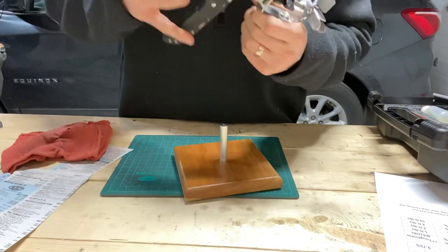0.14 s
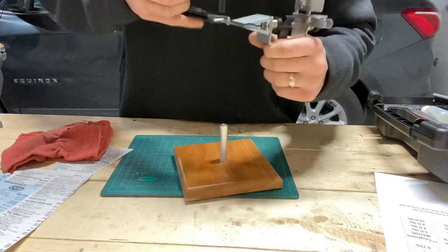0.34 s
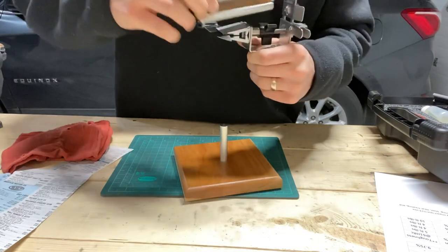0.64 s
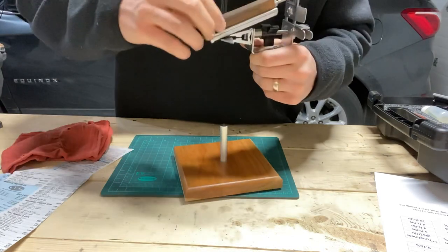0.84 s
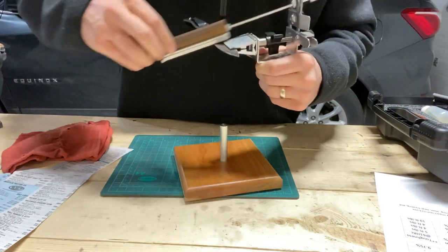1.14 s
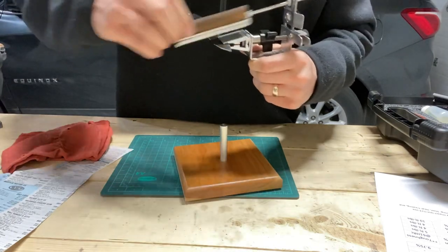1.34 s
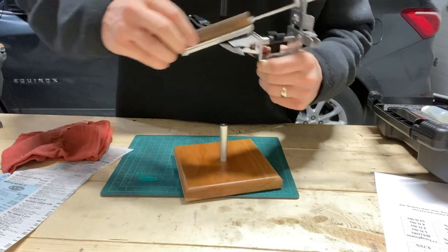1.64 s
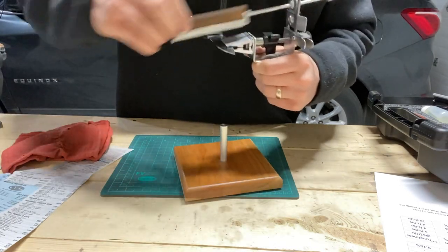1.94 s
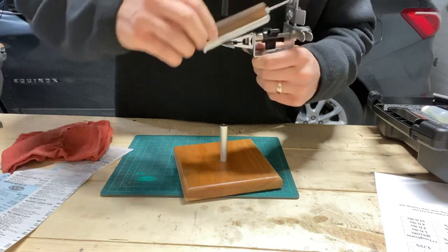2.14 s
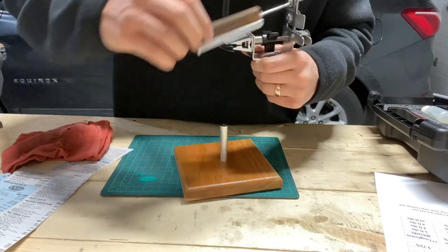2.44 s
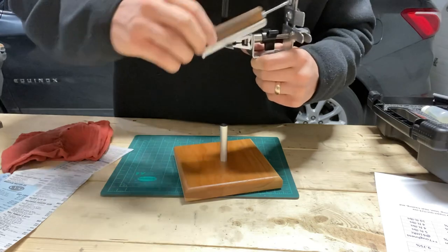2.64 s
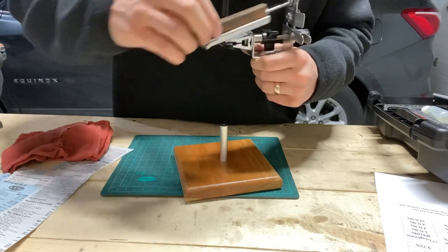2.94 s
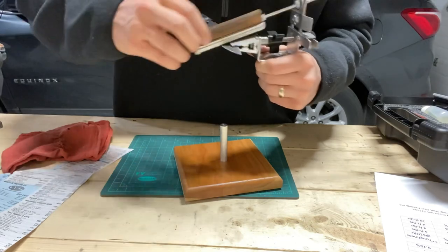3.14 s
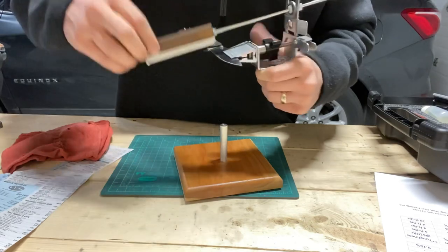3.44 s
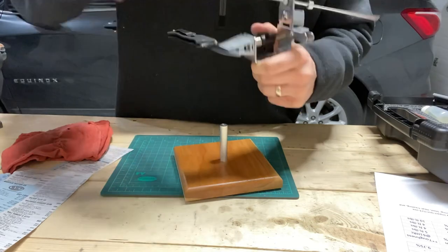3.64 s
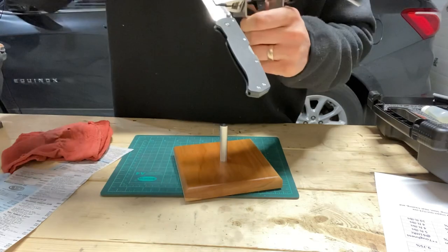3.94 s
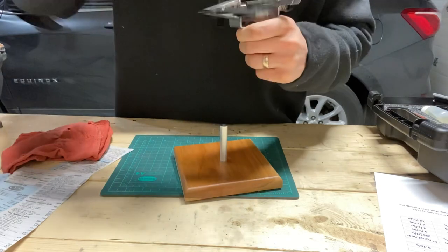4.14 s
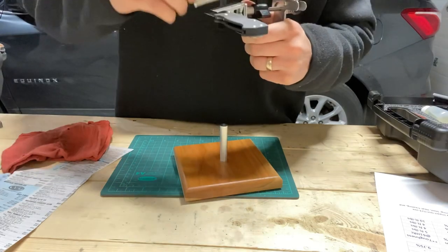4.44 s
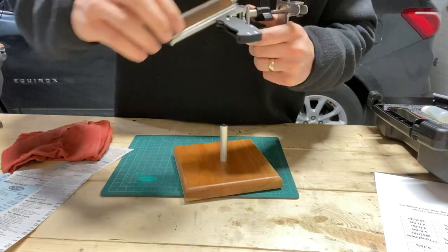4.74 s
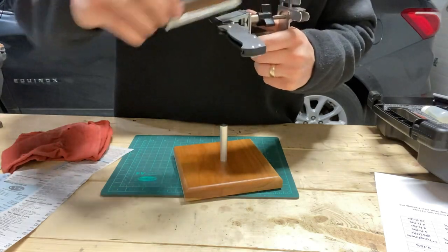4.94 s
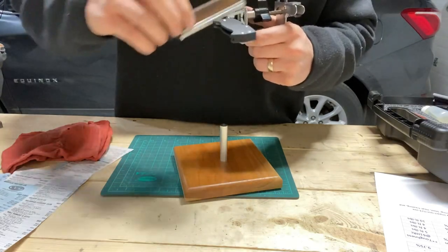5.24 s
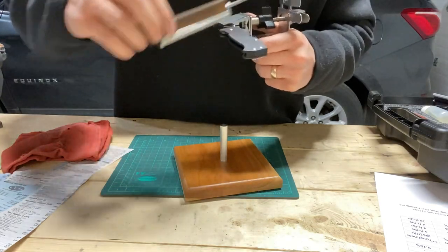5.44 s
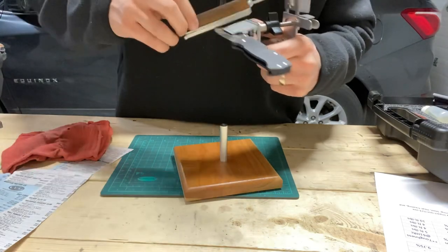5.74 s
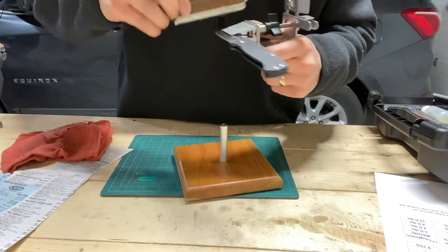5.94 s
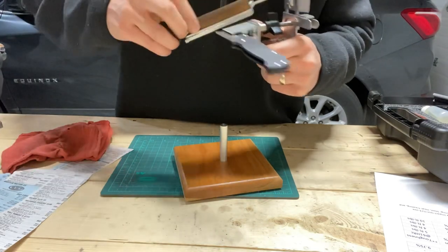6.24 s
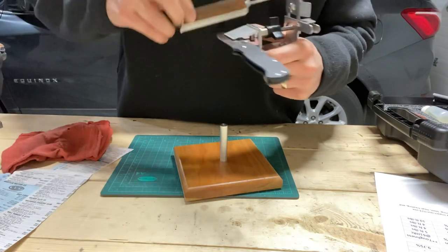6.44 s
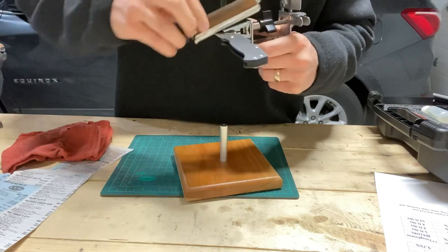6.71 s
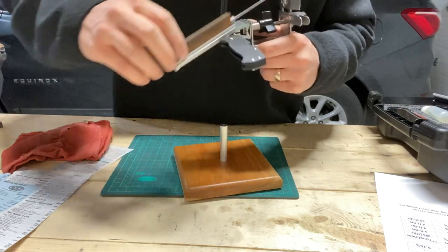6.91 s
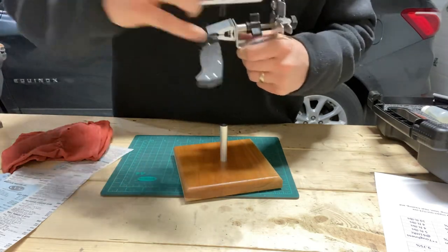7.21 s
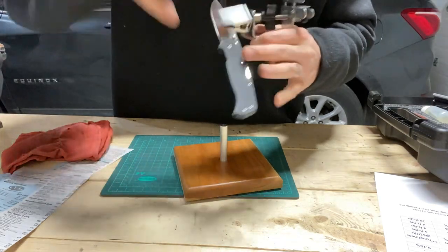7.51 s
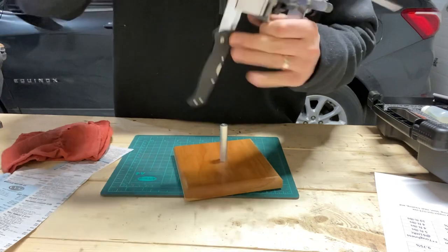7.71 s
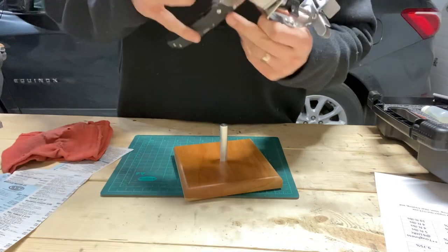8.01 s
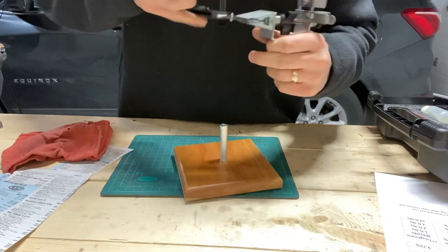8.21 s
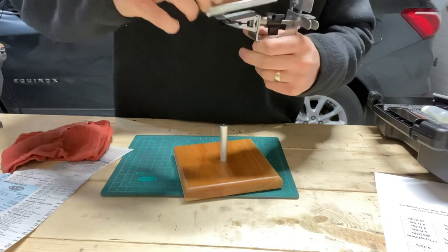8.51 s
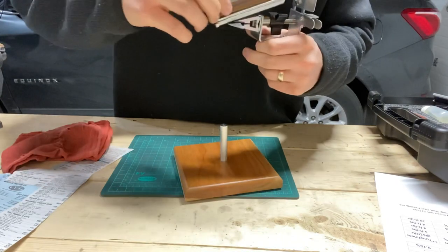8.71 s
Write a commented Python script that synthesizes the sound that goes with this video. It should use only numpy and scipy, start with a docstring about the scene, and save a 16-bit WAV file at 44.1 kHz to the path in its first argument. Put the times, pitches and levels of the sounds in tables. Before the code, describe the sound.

In a garage with a steady low hum, a steel knife clamp rubs, squeaks and snaps over. A leather strop then makes five passes along the blade, with light taps, a faint sliding rod hiss and short rasps. The rod clacks, the clamp turns, and five more passes follow. Near the end the clamp rubs and snaps again, and the strop lands softly. The tool sounds close, with a short room echo.

```python
"""A low hum fills a garage, where a knife in a guided sharpener is stropped at the workbench.
First the steel clamp rubs, squeaks and snaps over. Then five passes: the leather lands on the blade
and the guide rod hisses through its pivot; on three of them the edge bites and rasps. Near 3.5 s the
rod clacks at its stop and the clamp is turned, and the other side gets five passes, three rasping.
From 7.2 s the clamp rubs and snaps over again, and the strop touches down softly one last time."""
import sys
import numpy as np
from scipy import signal
from scipy.fft import rfft, irfft
from scipy.io import wavfile

SR = 44100
rng = np.random.default_rng(int(sys.argv[2]) if len(sys.argv) > 2 else 0)


def dump_mix(stems):
    """Bounce the given channels to the path in sys.argv[1] as a 16-bit WAV at rate SR."""
    frames = np.atleast_2d(stems).T  # one column per channel
    limited = np.clip(frames, -1, 1)  # hard clip at full scale
    pcm = np.round(limited * 32767).astype(np.int16)
    wavfile.write(sys.argv[1], SR, pcm)


N = 391166
TIME = np.arange(N) / SR

# rumble of moving air: freq_hz, gain_db
AIR_EQ = [(15, 0.5), (35, -14), (48, -2), (62, 10), (85, 1.5), (145, 3.5), (175, -7.5), (260, -19.5),
          (400, -31.5), (700, -38), (1750, -40), (2050, -38), (2400, -41), (6000, -45)]
# machine tones in the room: pitch_hz, level_db
HUM_TONES = [(59.6, -60.5), (120, -71), (144, -68.5), (199, -73)]
# rod and clamp hit their stops: time_s, level_db, bright_db, decay_ms
CLACKS = [(0.024, -48.5, 0, 4.2), (0.1692, -49.5, -2, 4.2), (0.2691, -25.5, 4, 2.2), (0.3506, -19, 5, 1.7),
          (2.4946, -45, 5, 2), (3.3475, -22.5, 1, 2.5), (3.3511, -24.5, 8, 4), (3.678, -30.5, -3, 3.9),
          (3.7122, -33, -6, 3.3), (3.7704, -31, 2, 3.3), (4.013, -42.5, -6.5, 1.8), (4.0334, -34, 8.5, 1),
          (4.1525, -29, 8, 3.5), (4.8043, -33, 12.5, 2.4), (4.8198, -37.5, 14.5, 3.8),
          (5.366, -23.5, 9, 4.4), (6.0144, -52, 8, 5.4), (6.186, -41.5, 13.5, 1.4),
          (6.9656, -27.5, 10.5, 2.7), (7.26, -32, 6.5, 1.8), (7.3106, -32, -0.5, 0.62),
          (7.569, -30, 2.5, 1.3), (7.6057, -38, 7, 5.7), (7.7617, -47, -26, 2.5), (8.109, -33, 13.5, 2.3),
          (8.2023, -19, 3, 3.5)]
# crack of steel parts meeting: freq_hz, gain_db
STEEL_EQ = [(200, -3.5), (450, 3.5), (620, 3.5), (1100, 10), (1600, 1.5), (2300, 11.5), (3100, 11),
            (4200, 1), (5500, -3.5), (7000, -7), (8800, -5), (12000, -7), (16000, 3)]
# the clamp rubs in its socket: start_s, end_s, first_db, last_db
CLAMP_RUBS = [(0.208, 0.262, -60.5, -46.5), (0.258, 0.378, -78, -39), (2.473, 2.653, -60.5, -76),
              (3.502, 3.832, -62.5, -51), (4.159, 4.204, -42, -48.5), (4.956, 5.074, -58, -70),
              (5.993, 6.032, -72, -55.5), (7.25, 7.397, -57.5, -61), (7.556, 7.713, -50, -66),
              (8.034, 8.103, -64.5, -49), (8.093, 8.24, -47, -58)]
# tone of that rub: freq_hz, gain_db
SOCKET_EQ = [(200, -17.5), (450, -8.5), (650, -13.5), (1000, -7.5), (2500, 2), (3800, 1.5), (6000, -5),
             (9000, -10.5), (16000, -19)]
# dry joints sing: start_s, end_s, first_db, last_db, pitch_hz
SQUEAKS = [(0.214, 0.267, -63.5, -61, 2770), (0.262, 0.36, -47, -59, 3500), (2.487, 2.54, -65, -71, 2640),
           (3.579, 3.644, -69, -61, 2730), (3.614, 3.654, -61.5, -57, 3800), (4.986, 5.03, -67, -59, 2650),
           (5.994, 6.03, -62.5, -63, 2710), (8.108, 8.207, -47, -62.5, 3460)]
# partials of a squeak: pitch_ratio, gain_db
SQUEAK_PARTIALS = [(1, 3), (.74, -9.5), (1.33, -4)]
# hard hits ring one steel part: time_s, pitch_hz, level_db
PINGS = [(.270, 3430, -28), (0.352, 1040, -46.5), (0.352, 2380, -29), (1.081, 9300, -25),
         (3.352, 8600, -32), (4.155, 12650, -42), (5.365, 11940, -26.5), (6.845, 7640, -29.5),
         (6.964, 11800, -26.5), (7.259, 11640, -33), (7.762, 1630, -48), (8.201, 1016, -37.5)]
# the rod slides on its own as the clamp turns over: start_s, end_s, peak_db
ROD_SWINGS = [(0.398, 0.66, -63), (7.34, 7.58, -65.5)]
# hiss of the sliding rod: freq_hz, gain_db
ROD_EQ = [(300, -16.5), (4000, -15.5), (6300, -15), (7400, -26.5), (8500, -2), (10000, 3), (13000, -0.5),
          (16000, -4)]
# the strop lands, is pushed and drawn back: time_s, landing_db, thud_db, push_db, return_db
PASSES = [(0.842, -42.5, -45, -66.5, -58.5), (1.5212, -43, -47, -60, -61.5),
          (2.1017, -30.5, -35.5, -65, -63), (2.5828, -48, -38.5, -64, -62), (3.057, -41, -40, -61.5, -76),
          (4.5304, -39.5, -39, -63.5, -57.5), (5.1108, -37.5, -39, -65.5, -62),
          (5.6111, -41.5, -39.5, -65.5, -67.5), (6.1712, -29.5, -36.5, -64.5, -67),
          (6.631, -27.5, -42.5, -63.5, -60.5), (8.6838, -62, -58.5, -71.5, -62.5)]
# firm landings are brighter than soft ones: landing_db, bright_db, decay_ms
LANDING_TOUCH = [(-39.5, -3.5, 4), (-26.5, 4, 4.5)]
# tone of leather on steel: freq_hz, gain_db
LEATHER_EQ = [(100, -9.5), (220, -4.5), (430, 0), (620, -8.5), (950, 4.5), (1280, -3.5), (1600, 7),
              (2000, -3), (2900, 3.5), (4200, -5), (6000, -6), (9000, -13.5), (16000, -18.5)]
# the rod shifts in its pivot: time_s, level_db
PIVOT_TICKS = [(1.035, -49), (1.211, -44.5), (1.833, -41), (2.291, -50.5), (2.7581, -51.5), (3.5414, -46.5),
               (5.232, -45), (5.7561, -51), (6.774, -50.5), (7.5538, -49)]
# leather on the edge: start_s, end_s, first_db, last_db, fizz_db, ring_hz, ring_db, body_db, bite_db
RASPS = [(1.0705, 1.164, -37.5, -41.5, -6, 1600, -11, -25, -23.5),
         (1.6824, 1.763, -34, -44.5, -9.5, 1550, -10.5, -15, -25),
         (3.2435, 3.34, -38.5, -43.5, -8.5, 1640, -15, -29.5, -36.5),
         (4.754, 4.829, -40, -35, -10.5, 2070, -8.5, -23, -33),
         (5.275, 5.361, -38, -37, -14, 2110, -7, -21.5, -28),
         (6.842, 6.982, -41, -40.5, -13, 2230, -11, -29, -25)]
# modes of the blade and its clamp: pitch_hz, gain_db, t60_s
BLADE_MODES = [(447, 3, .08), (1329, -10, .5), (1571, -5, .07), (1657, -5, .07), (2103, -1, .07),
               (2326, 2, .06), (2720, 7, .045), (3515, 3, .06), (7300, 12, .035), (8600, 14, .035),
               (12300, 17, .025)]
# reverb time of the garage: freq_hz, t60_s
GARAGE_DECAY = [(200, 0.13), (600, 0.45), (1500, 0.4), (4000, 0.48), (8000, 0.44), (14000, 0.37)]
# overall tone, with bright peaks at 7-9 kHz and the highest treble cut away: freq_hz, gain_db
OVERALL_EQ = [(100, 1), (6000, -1.5), (7200, 6), (8300, 1), (9400, 4.5), (10200, -10.5), (11500, 1.5),
              (12800, -4.5), (14000, -15.5), (14900, -25), (16200, -37.5)]
# phase between the sides: freq_hz, left_lead_rad
STEREO_PHASE = [(50, 0), (500, -.25), (1100, -.7), (1600, -.3), (2900, -1.8), (4400, -2.2), (5500, -2.1),
                (6500, -1), (8000, 0), (9200, 1.3), (10400, 3.14), (11500, 4.5), (12700, 6.1), (13700, 6.6),
                (14800, 8.8)]
# likeness of the sides: freq_hz, correlation
STEREO_LIKENESS = [(60, .96), (150, .85), (400, .88), (1200, .72), (2500, .75), (4300, .35), (6000, .5),
                   (7500, .96), (16000, .97)]
# lean of the image: freq_hz, left_minus_right_db
STEREO_BALANCE = [(30, 1), (300, 1.5), (700, -3), (1400, -3.5), (2500, -1.5), (8000, -0.5)]


def amp(db):
    """Decibels to gain."""
    return 10 ** (np.asarray(db) / 20)


def unit(x):
    """Scales to rms 1."""
    return x / np.sqrt(np.mean(x ** 2) + 1e-20)


def curve_at(points, hz):
    """Reads a curve on a log frequency axis."""
    freqs, values = np.transpose(points)
    return np.interp(np.log(hz + 1), np.log(freqs + 1), values)


def bins(x):
    """Frequencies of the spectrum of x."""
    return np.fft.rfftfreq(x.shape[-1], 1 / SR)


def add(mix, time_s, sound):
    """Drops a stereo sound into the mix."""
    part = mix[:, max(round(time_s * SR), 0):][:, :sound.shape[1]]
    part += sound[:, :part.shape[1]]


def eq(x, points, size=2048):
    """Minimum-phase EQ, so attacks stay sharp."""
    log_gain = np.log(amp(curve_at(points, abs(np.fft.fftfreq(size, 1 / SR)))))
    taps = np.fft.ifft(np.exp(np.conj(signal.hilbert(log_gain)))).real[:size // 2]
    return signal.oaconvolve(x, taps[None], axes=1)[:, :x.shape[1]]


def band(x, lo_hz, hi_hz):
    """Band-pass, at rms 1."""
    return unit(signal.sosfilt(signal.butter(2, [lo_hz, hi_hz], "band", fs=SR, output="sos"), x))


def resonate(x, hz, width_hz):
    """One resonance driven by x, at rms 1."""
    return band(x, hz - width_hz / 2, hz + width_hz / 2)


def stereo(x):
    """Blends two unrelated channels to the scene's stereo width."""
    spectrum = rfft(x)
    angle = np.arcsin(np.clip(curve_at(STEREO_LIKENESS, bins(x)), 0, 1)) / 2
    return irfft(np.cos(angle) * spectrum + np.sin(angle) * spectrum[::-1], x.shape[1])


def noise(size=N):
    """Stereo white noise."""
    return stereo(rng.standard_normal((2, size)))


def drift(points):
    """Random modulation through points spread over the scene."""
    return np.interp(TIME, np.linspace(0, TIME[-1], points), np.clip(rng.standard_normal(points), -2, 2))


def friction(slips_per_s, spread_db, smooth=.6):
    """Tiny slips of uneven size over a smooth hiss."""
    slips = amp(spread_db * np.minimum(rng.exponential(1, N), 4)) * (rng.random(N) < slips_per_s / SR)
    power = signal.lfilter([1], [1, -np.exp(-1 / (.0004 * SR))], slips ** 2)
    return unit(noise() * np.sqrt(power / power.mean() + smooth ** 2))


def contact(start, end, first_db, last_db, attack_s=.0011, release_s=.011):
    """Envelope of a rub: it grips at once, ramps its pressure and lets go."""
    grip = np.clip(np.minimum((TIME - start) / attack_s, (end - TIME) / release_s + .5), 0, 1)
    return grip * amp(np.interp(TIME, [start, end], [first_db, last_db]))


def hit(time_s, db, bright_db, decay_ms, body_db=-13.5):
    """Cue for a knock: time_s, tick_db (tip), clack_db (frame), thud_db (hand-held body), decay_ms."""
    return time_s, db + bright_db, db, db + body_db, decay_ms


def room_hum(air_db=-53, waver_rad=.52):
    """The bed: a rumble of moving air with wavering machine tones in it."""
    white = noise()
    air = unit(irfft(rfft(white) * amp(curve_at(AIR_EQ, bins(white))), N))
    tones = sum(amp(db) * unit(np.sin(2 * np.pi * hz * TIME + waver_rad * drift(60)))
                for hz, db in HUM_TONES)
    return amp(air_db) * air + tones


def stop_clacks(rebound_s=.022, rebound_db=-20):
    """Cues: steel meets its stop and rebounds once."""
    delays = rebound_s * rng.uniform(.5, 1.5, len(CLACKS))
    rebounds = [hit(s + delay, db + rebound_db, bright, decay)
                for (s, db, bright, decay), delay in zip(CLACKS, delays)]
    return [hit(*row) for row in CLACKS] + rebounds


def knocks(cues, lead_s=.005, attack_s=.0007, lead_in_db=-25, rattle_db=-20, rattle_s=.0046, size=4096):
    """Plays each cue: a faint swell of noise, a crack of dense steel modes, a rattle of loose joints."""
    out, t = np.zeros((2, N)), np.arange(size) / SR - lead_s
    after = np.maximum(t, 0)
    lead_in = amp(lead_in_db) * np.exp(-2 * abs(t) / lead_s)
    attack = 1 - np.exp(-after / attack_s)
    rattle = amp(rattle_db) * np.exp(-after / rattle_s)
    for s, tick_db, clack_db, thud_db, decay_ms in cues:
        envelope = lead_in + attack * (np.exp(-1000 * after / decay_ms) + rattle)
        crack = eq(noise(size) * envelope, STEEL_EQ)
        top_hz = np.interp(tick_db, [-42, -22], [12500, 17000])  # harder hits are brighter
        tick = amp(tick_db - 18.5) * band(crack, 5200, top_hz)
        clack = amp(clack_db - 20.5) * band(crack, 850, 4000)
        thud = amp(thud_db - 22.5) * band(crack, 260, 650)
        add(out, s - lead_s, tick + clack + thud)
    return out


def blade_ring(tool, ring_db=-56):
    """Every hit and rub sets the blade ringing."""
    t = np.arange(SR // 2) / SR
    ring = sum(amp(db + ring_db - 60 * t / t60) * np.sin(2 * np.pi * hz * t)
               for hz, db, t60 in BLADE_MODES)
    return signal.oaconvolve(tool, ring[None], axes=1)[:, :N]


def garage_reverb(tool, early_db=-9, early_decay_s=.011, echoes_per_s=1500, tail_db=-12):
    """Quick echoes off the bench and the parked car, then the tail of the room."""
    t = np.arange(SR) / SR
    wash = noise(SR) * np.clip((t - .003) / .002, 0, 1)
    hz, frame_s, spectrum = signal.stft(wash, SR, nperseg=256)
    decay = amp(-60 * frame_s / curve_at(GARAGE_DECAY, hz)[:, None])
    tail = signal.istft(spectrum * decay, SR, nperseg=256)[1][:, :SR]
    echoes = stereo(rng.standard_normal((2, SR)) * (rng.random(SR) < echoes_per_s / SR))
    early = echoes * np.exp(-t / early_decay_s) * (t > .002)
    room = (amp(early_db) * unit(early) + amp(tail_db) * unit(tail)) / np.sqrt(SR)
    room = eq(room, [(4500, 1), (8000, -4)])  # soften the top
    return signal.oaconvolve(tool, room, axes=1)[:, :N]


def clamp_rub(level_db=-1, squeak_db=-4):
    """Dry, gritty rubbing as the clamp turns; now and then a joint sings."""
    grit = friction(slips_per_s=220, spread_db=4)
    rubs = sum(contact(*rub) for rub in CLAMP_RUBS) * unit(eq(grit, SOCKET_EQ))
    squeaks = sum(contact(*rub) * amp(db) * resonate(grit, ratio * hz, width_hz=330)
                  for *rub, hz in SQUEAKS for ratio, db in SQUEAK_PARTIALS)
    return amp(level_db) * rubs + amp(squeak_db) * squeaks


def loose_joints(ticks_per_s=14, lift_db=14, spread_db=3.5, count=400):
    """Cues: the joints tick at random while the clamp rubs, riding its level."""
    times = np.cumsum(rng.exponential(1 / ticks_per_s, count))
    lifts = lift_db + spread_db * rng.standard_normal(count)
    return [hit(s, lift + np.interp(s, [start, end], ramp_db), bright_db=1.5, decay_ms=2.5)
            for start, end, *ramp_db in CLAMP_RUBS for s, lift in zip(times, lifts) if start < s < end]


def steel_pings(attack_s=.00013, decay_s=.0051, size=4096):
    """Rod, stop or clamp jaw rings for an instant before the hand damps it."""
    out, t = np.zeros((2, N)), np.arange(size) / SR
    envelope = np.exp(-t / decay_s) * (1 - np.exp(-t / attack_s))
    for s, hz, db in PINGS:
        add(out, s, amp(db) * np.tile(envelope * np.sin(2 * np.pi * hz * t), (2, 1)))
    return out


def rod_speed(longest_s=.74, arch=.8):
    """Speed envelope of the rod: one swell for each swing, push and return."""
    travels = list(ROD_SWINGS)
    gaps = np.diff([row[0] for row in PASSES] + [np.inf])
    for (s, _, _, push_db, return_db), length in zip(PASSES, np.minimum(gaps, longest_s)):
        travels.append((s, s + .49 * length, push_db))
        travels.append((s + .51 * length, s + .95 * length, return_db))
    speed = np.zeros(N)
    for start, end, db in travels:
        progress = np.clip((TIME - start) / (end - start), 0, 1)
        speed += amp(db) * (np.sin(np.pi * progress) + 1e-9) ** arch
    return speed


def rod_slide(level_db=-5, flutter_db=5, whistle_db=-9, wander_hz=170, dry_db=-22, catch_db=8):
    """The polished rod hisses with its speed, under a thin wandering whistle; dry spots catch."""
    white = noise()
    hiss = unit(eq(white, ROD_EQ)) * amp(flutter_db * drift(420))
    wander = np.exp(2j * np.pi * np.cumsum(wander_hz * drift(330)) / SR)
    whistle = (signal.hilbert(resonate(white, hz=7550, width_hz=520)) * wander).real
    dry_spots = resonate(white, hz=2750, width_hz=700) * amp(dry_db + catch_db * drift(400))
    whistle *= amp(whistle_db + flutter_db * drift(220))
    return amp(level_db) * rod_speed() * (hiss + dry_spots + whistle)


def strop_landings():
    """Cues: the strop is set down on the blade at the top of each pass."""
    soft_to_firm, bright_db, decay_ms = np.transpose(LANDING_TOUCH)
    return [(s, db + np.interp(db, soft_to_firm, bright_db), db, thud_db,
             np.interp(db, soft_to_firm, decay_ms)) for s, db, thud_db, *_ in PASSES]


def leather_scuffs():
    """The leather settles on the blade with a short, soft rub."""
    envelope = sum(contact(s - .003, s + .03, db - 19, db - 27) for s, db, *_ in PASSES)
    return envelope * unit(eq(friction(slips_per_s=450, spread_db=-1.5, smooth=.94), LEATHER_EQ))


def pivot_ticks(bright_db=9):
    """Cues: light, bright ticks as the rod shifts in its pivot."""
    return [hit(s, db - bright_db, bright_db, decay_ms=2.7) for s, db in PIVOT_TICKS]


def edge_bites(skips=4, skip_s=.0095, first_skip_db=-7, loss_db=4, bright_db=3, decay_ms=.92):
    """Cues: the edge digs into the leather as a rasp starts, then skips, weaker each time."""
    cues = []
    for start, *_, db in RASPS:
        skip_times = start + skip_s * np.cumsum(rng.uniform(.75, 1.25, skips))
        cues.append(hit(start, db, bright_db, decay_ms))
        cues += [hit(s, db + first_skip_db - k * loss_db, bright_db, decay_ms / 2)
                 for k, s in enumerate(skip_times)]
    return cues


def leather_rasp(level_db=-1):
    """The edge catches and slips on leather: a hollow rasp, fizz on top, a ring that differs by side."""
    slips = friction(slips_per_s=450, spread_db=3)
    rasp = unit(eq(slips, LEATHER_EQ))
    body = resonate(slips, hz=420, width_hz=130)
    fizz = band(slips, 7000, 9500)
    out = np.zeros((2, N))
    for *rub, fizz_db, ring_hz, ring_db, body_db, _ in RASPS:
        ring = resonate(slips, ring_hz, width_hz=500)
        out += contact(*rub) * (rasp + amp(body_db) * body + amp(fizz_db) * fizz + amp(ring_db) * ring)
    return amp(level_db) * out


def scene():
    """The sharpener and its ringing blade, in the garage, over the hum."""
    cues = strop_landings() + edge_bites() + stop_clacks() + pivot_ticks() + loose_joints()
    tool = knocks(cues) + steel_pings() + leather_rasp() + leather_scuffs() + clamp_rub() + rod_slide()
    tool = tool + blade_ring(tool)
    return tool + garage_reverb(tool) + room_hum()


def record(dry, cutoff_hz=16300):
    """A bright overall EQ, the sides set apart in phase and level, then a steep low-pass."""
    hz, side = bins(dry), np.array([[.5], [-.5]])
    balance = amp(side * curve_at(STEREO_BALANCE, hz))
    phase = np.exp(1j * side * curve_at(STEREO_PHASE, hz))
    heard = irfft(rfft(eq(dry, OVERALL_EQ)) * balance * phase, N)
    low_pass = signal.firwin(511, cutoff_hz, window=("kaiser", 9), fs=SR)
    return signal.oaconvolve(heard, low_pass[None], "same")


dry = scene()
out = record(dry)
dump_mix(out)
```